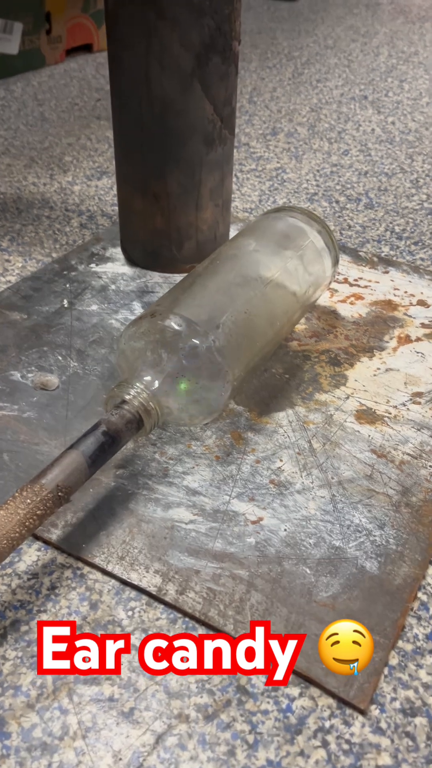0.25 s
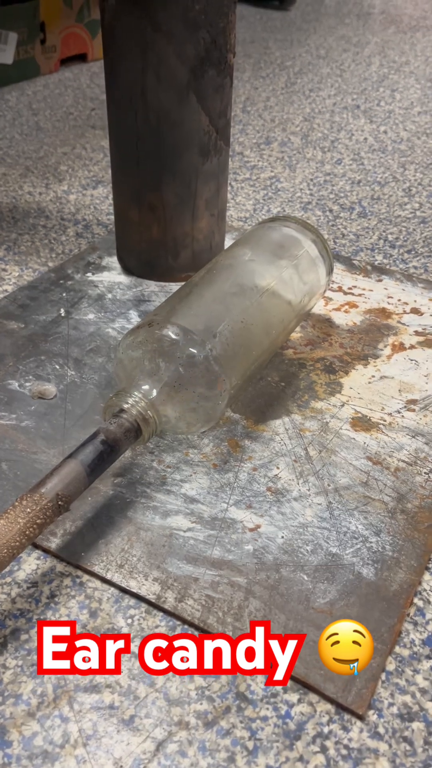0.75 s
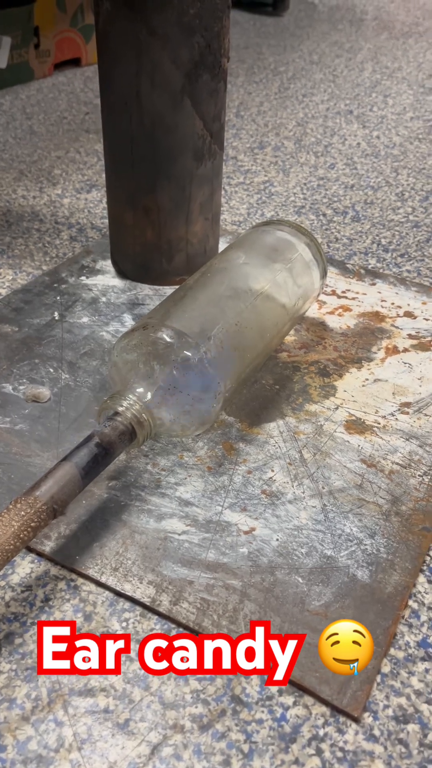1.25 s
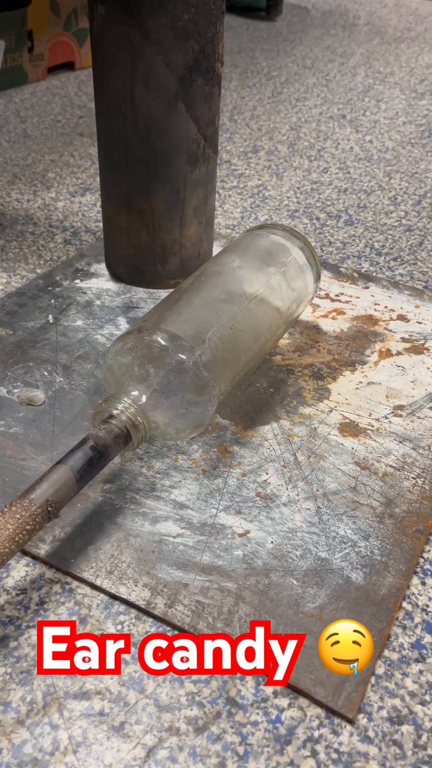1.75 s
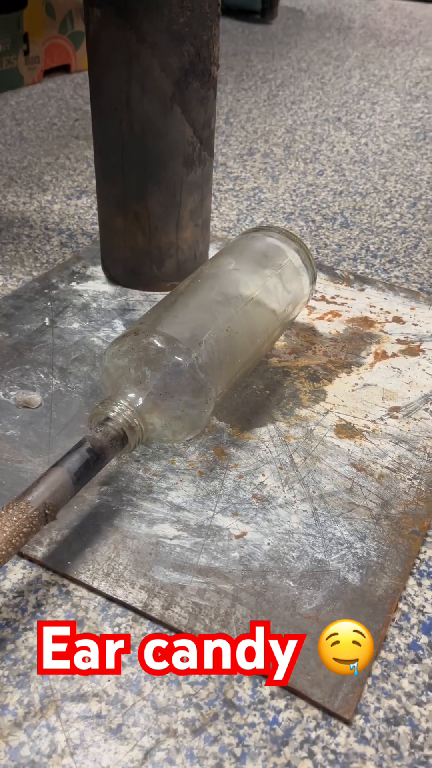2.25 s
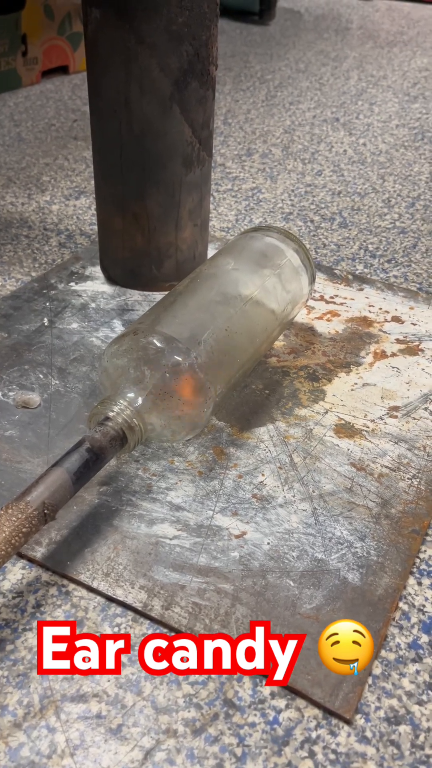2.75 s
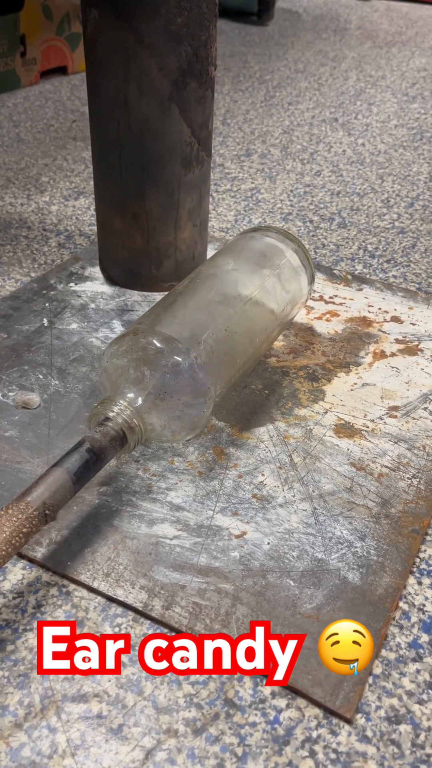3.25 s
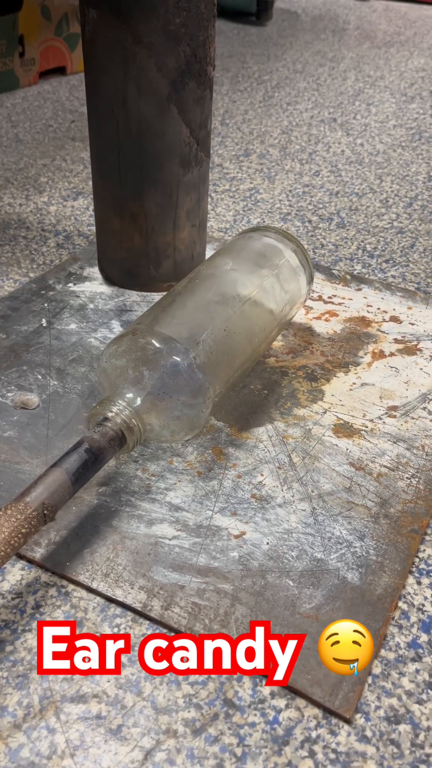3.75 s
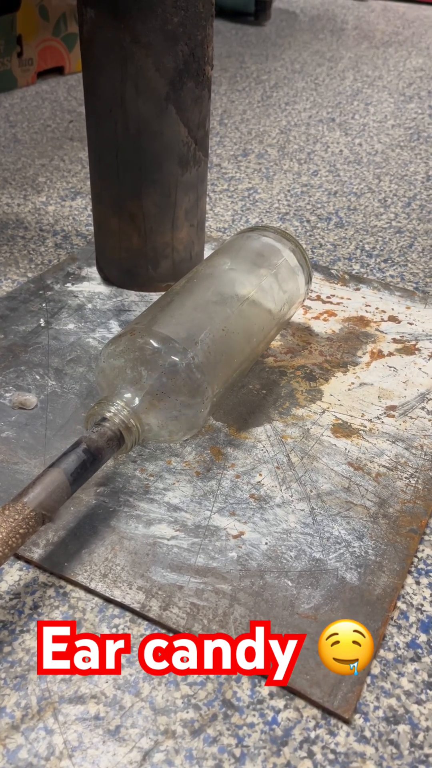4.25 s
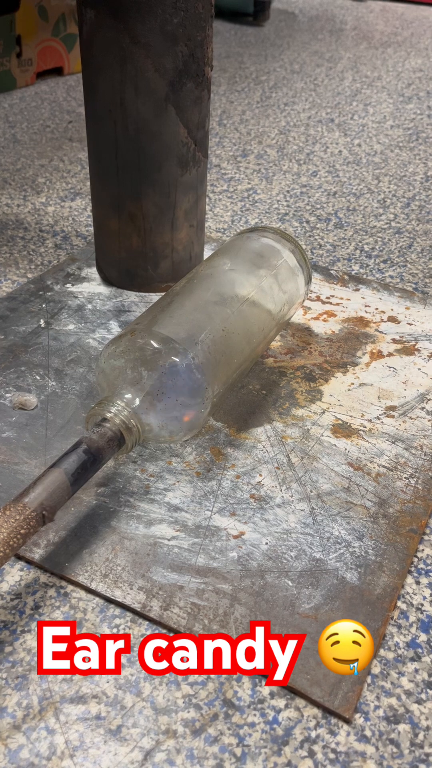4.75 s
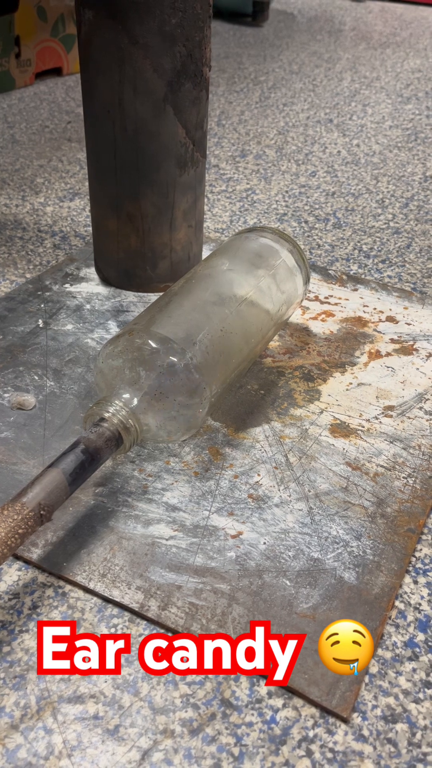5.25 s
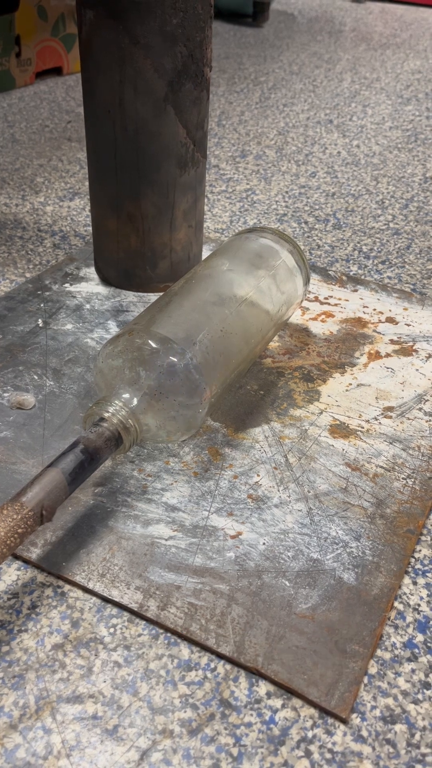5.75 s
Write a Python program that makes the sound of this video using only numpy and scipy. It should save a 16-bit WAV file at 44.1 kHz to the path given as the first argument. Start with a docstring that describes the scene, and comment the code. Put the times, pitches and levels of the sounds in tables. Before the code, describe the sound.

A small homemade pulse jet sputters loudly close by outdoors, a rapid uneven rattle of raspy cracks and low booms.

```python
"""A fast, uneven sputter, close by and outdoors: a pulse jet made of a glass bottle and a steel pipe.
It fires some 30 times a second on a metal sheet. Each explosion spits a crack and a rasping jet of
shaped noise, booms through the pipe as a short swinging tone and gulps air back in one deep swing.
Behind them the pipe drones, the bottle whistles, the flame roars low and the yard adds a short tail."""
import sys
import numpy as np
from scipy import signal
from scipy.fft import rfft, irfft, next_fast_len
from scipy.io import wavfile
from scipy.ndimage import uniform_filter1d, map_coordinates

SR = 44100
rng = np.random.default_rng(int(sys.argv[2]) if len(sys.argv) > 2 else 0)


def file_out(sig):
    """Save sig as 16-bit WAV at sys.argv[1]."""
    # one column per channel
    cols = np.atleast_2d(sig).T
    # limit, then scale
    lim = np.clip(cols, -1, 1)
    pcm = np.round(lim * 32767).astype(np.int16)
    wavfile.write(sys.argv[1], SR, pcm)


N = 264159  # length of the sound in samples

FIRING_HZ = 29  # the engine's own pace
RASP_RISE_S, HISS_RISE_S = .0036, .0033  # time for the jet to build up
RASP_FALL_S, HISS_FALL_S = .0028, .0018  # time for the jet to die away


def amp(db):
    """Turn decibels into a gain."""
    return 10 ** (np.asarray(db) / 20)


def unit(x):
    """Scale to an average strength (rms) of 1."""
    return x / np.sqrt(np.mean(x ** 2) + 1e-20)


def along(points, hz):
    """Read a curve of (pitch_hz, value) points, joined on a logarithmic pitch axis."""
    point_hz, value = np.transpose(points)
    return np.interp(np.log(hz + 1), np.log(point_hz + 1), value)


def filtered(x, response):
    """Multiply the spectrum of x by a response, which may be complex."""
    size = next_fast_len(N + SR // 2)
    spectrum = rfft(x, size) * response(np.fft.rfftfreq(size, 1 / SR))
    return irfft(spectrum, size)[..., :N]


def noise(colour):
    """Make noise of rms 1 whose spectrum follows a table of levels."""
    return unit(filtered(rng.standard_normal(N), lambda hz: amp(along(colour, hz))))


def resonate(x, modes):
    """Ring a set of resonances with x; a narrow one rings longer."""
    def response(hz):
        return sum(amp(db) * 1j * hz * width / (centre * centre - hz * hz + 1j * hz * width)
                   for centre, width, db in modes)
    return filtered(x, response)


def place(times_s, shape):
    """Add up one short sound per time; shape maps the seconds around it to rows (events, samples)."""
    k = np.arange(-SR // 32, SR // 16)
    at = np.round(times_s * SR).astype(int) + k
    inside = (at >= 0) & (at < N)
    return np.bincount(at[inside], shape(k / SR)[inside], N)


def swell(t, rise_s, fall_s):
    """A rounded peak, height 1 at t = 0, with exponential flanks."""
    return 2 / (np.exp(np.minimum(-t / rise_s, 50)) + np.exp(np.minimum(t / fall_s, 50)))


def spurt(t, rise_s, fall_s):
    """A peak of height 1 at t = 0 that bursts out of silence and dies exponentially."""
    return np.where(t < 0, np.exp(-(t / rise_s) ** 2), swell(t, fall_s, fall_s))


def swing(t, hz, glide, settle_s):
    """Phase of one swing: sharp by the share glide before t = 0, then sagging as the gas cools."""
    bend = np.log(2 / (np.exp(t / settle_s) + np.exp(-t / settle_s)))
    return 2 * np.pi * hz * (t + glide * settle_s * bend)


def wobble(rate_hz):
    """A smooth random curve with rate_hz knots a second."""
    knots = rng.standard_normal(int(N * rate_hz / SR) + 4)
    return map_coordinates(knots, [np.arange(N) * rate_hz / SR])


def vary(firing_s, spread):
    """A random factor near 1 for each firing."""
    return np.exp(spread * rng.standard_normal(firing_s.shape))


def stored(firing_s, db, ebb_s):
    """Strength of a resonator that each firing tops up and that ebbs in between; rms 1."""
    supply = place(firing_s, lambda t: amp(db) ** 2 * spurt(t, RASP_RISE_S, RASP_FALL_S))
    energy = signal.lfilter([1], [1, -np.exp(-1 / (ebb_s * SR))], supply)
    return unit(np.sqrt(np.abs(energy) + 1e-12))


# The clearly heard explosions, from loud cracks to dull booms; levels only compare one with another.
# Columns: start_s, rasp_db, hiss_db, boom_db, boom_delay_s
EXPLOSION_LIST = [(0.035, -46, -59, -23.5, 0.004), (0.058, -35, -49.5, -15, 0.013),
                  (0.105, -41, -55, -20.5, 0.004), (0.133, -31.5, -41.5, -15.5, 0.011),
                  (0.168, -39, -48.5, -16.5, 0.009), (0.201, -31, -35.5, -9, 0.01),
                  (0.226, -36, -62, -9.5, 0.002), (0.25, -41.5, -51.5, -17.5, 0.0),
                  (0.297, -45.5, -71.5, -17.5, 0.002), (0.327, -37.5, -46.5, -12.5, 0.004),
                  (0.353, -37, -60.5, -18.5, 0.013), (0.381, -38.5, -63, -16.5, -0.00099),
                  (0.415, -25.5, -34, -11, 0.01), (0.437, -40.5, -57, -14, 0.015),
                  (0.471, -28.5, -38, -17, 0.01), (0.494, -30.5, -48, -18.5, 0.011),
                  (0.514, -34, -41, -13.5, 0.004), (0.535, -28.5, -40, -12, 0.005),
                  (0.559, -33.5, -39.5, -8, 0.011), (0.711, -41, -63, -19.5, -0.0),
                  (0.741, -33, -46, -16, 0.0049), (0.769, -42.5, -63, -16.5, 0.004),
                  (0.872, -44, -62, -27.5, 0.0022), (0.909, -38.5, -43, -14, 0.005),
                  (0.944, -42.5, -51, -14, 0.009), (0.969, -33, -45, -16.5, 0.009),
                  (0.995, -46, -57, -12.5, 0.01), (1.024, -38.5, -52, -16.5, 0.01),
                  (1.067, -43.5, -67, -20, 0.008), (1.093, -31.5, -49.5, -12.5, 0.009),
                  (1.151, -43.5, -55.5, -14, 0.004), (1.186, -28, -37, -12.5, 0),
                  (1.211, -40, -47, -18.5, 0.004), (1.238, -30.5, -40, -12.5, 0.01),
                  (1.262, -43.5, -57.5, -11.5, 0.009), (1.285, -22, -33.5, -7, 0.01),
                  (1.327, -30, -45.5, -14.5, 0.004), (1.381, -28.5, -37, -11.5, 0.0074),
                  (1.403, -40.5, -39.5, -11.5, 0.008), (1.429, -33.5, -50.5, -11.5, 0.003),
                  (1.454, -48, -76, -14.5, 0.01), (1.534, -40.5, -54, -23, 0.004),
                  (1.577, -35, -52, -20, 0.013), (1.601, -35, -49, -14, 0.0037),
                  (1.635, -41, -62, -19, 0.005), (1.666, -33.5, -42, -11.5, 0.011),
                  (1.698, -36, -56, -17.5, 0.003), (1.731, -36.5, -52, -13, 0.005),
                  (1.756, -49, -60, -19.5, 0.004), (1.829, -36.5, -48, -24.5, 0.028),
                  (1.874, -39, -50, -20, 0.01), (1.911, -35, -44.5, -16.5, 0.007),
                  (1.946, -44, -60.5, -15, 0.007), (1.981, -33.5, -48, -19, 0.0048),
                  (2.017, -33, -42, -16, 0.009), (2.045, -44, -58.5, -20, 0.002),
                  (2.07, -35, -43, -17.5, 0.01), (2.166, -40.5, -65.5, -13.5, 0.006),
                  (2.252, -41.5, -59.5, -19, 0.0039), (2.298, -39, -59, -20, 0.01),
                  (2.332, -44.5, -58, -25, 0.007), (2.37, -34.5, -46.5, -22.5, 0.006),
                  (2.406, -43.5, -53, -14, 0.013), (2.482, -34.5, -53.5, -14, 0.003),
                  (2.515, -44.5, -73, -18, 0.006), (2.58, -39, -56.5, -17.5, 0.007),
                  (2.615, -45.5, -63.5, -16, 0.01), (2.666, -46, -60.5, -18, 0.000067),
                  (2.7, -32.5, -51.5, -19.5, 0.004), (2.738, -45, -64.5, -21, 0.001),
                  (2.772, -69.5, -85, -15.5, 0.007), (2.852, -36.5, -49.5, -16.5, 0.012),
                  (2.893, -45, -69.5, -18, 0.011), (2.92, -56, -79, -18.5, 0.006),
                  (2.962, -34, -45.5, -22, 0.00005), (2.991, -53.5, -57, -26, 0.0014),
                  (3.018, -32.5, -45.5, -13.5, 0), (3.048, -50, -74, -16, 0.006),
                  (3.09, -42.5, -53.5, -13.5, 0.002), (3.115, -38, -56.5, -17, 0.006),
                  (3.153, -55.5, -85, -15.5, 0.006), (3.194, -32.5, -40, -20, 0.004),
                  (3.221, -38, -42, -12.5, 0.011), (3.279, -38.5, -52, -14, 0.005),
                  (3.313, -44, -58, -19, 0.007), (3.342, -31, -43, -14, 0.006),
                  (3.371, -59, -72, -16, 0.006), (3.409, -39, -49.5, -20, 0.0012),
                  (3.433, -33.5, -45.5, -13, 0.007), (3.463, -35, -43.5, -12.5, 0.013),
                  (3.493, -50, -59.5, -15.5, 0.008), (3.524, -38, -59, -15.5, 0.007),
                  (3.576, -41, -51, -15.5, 0.01), (3.654, -41.5, -57.5, -22, 0.002),
                  (3.685, -44.5, -54, -13.5, 0.01), (3.758, -38, -52, -21, 0.011),
                  (3.797, -33.5, -44, -17.5, 0.008), (3.865, -30.5, -47, -15.5, 0.005),
                  (3.899, -53, -67, -19, 0.0033), (3.932, -47.5, -73, -22, 0.007),
                  (3.933, -43, -72, -26, 0.007), (4.123, -37, -53.5, -15.5, 0.011),
                  (4.153, -34, -50.5, -17, 0), (4.194, -46.5, -76.5, -15.5, 0.005),
                  (4.223, -38.5, -54.5, -17, 0.005), (4.264, -31.5, -41.5, -11.5, 0.001),
                  (4.348, -34, -54, -23.5, 0.011), (4.422, -43, -53.5, -16.5, 0.006),
                  (4.498, -31.5, -44, -18, 0.008), (4.524, -62.5, -81.5, -14.5, 0.006),
                  (4.551, -37.5, -58, -20.5, -0.00036), (4.615, -38, -61, -16, 0.007),
                  (4.642, -34.5, -50.5, -12, 0.008), (4.675, -37, -53, -16, 0.011),
                  (4.704, -35.5, -39.5, -13.5, 0.012), (4.733, -33, -43, -10.5, 0.008),
                  (4.756, -44, -54, -14, 0.008), (4.786, -32.5, -42, -12, 0.009),
                  (4.847, -36.5, -45.5, -17.5, 0.005), (4.871, -36, -45.5, -18, 0.014),
                  (4.901, -33.5, -44.5, -14.5, 0.007), (4.925, -40.5, -46.5, -10.5, 0.011),
                  (4.95, -32, -50.5, -14, 0.01), (4.978, -37.5, -49.5, -13, 0.005),
                  (5.009, -35, -44.5, -18.5, 0.0067), (5.036, -40, -46.5, -15.5, 0.00008),
                  (5.089, -39, -50, -9, 0.009), (5.124, -39.5, -60, -12.5, 0.005),
                  (5.151, -30, -42, -14, 0.001), (5.179, -38, -44.5, -12.5, 0.007),
                  (5.209, -40.5, -45.5, -16, 0.007), (5.239, -38.5, -54, -18, 0.005),
                  (5.267, -55.5, -77, -15, 0.006), (5.295, -44.5, -66, -14, 0.015),
                  (5.334, -33, -47.5, -17.5, 0.013), (5.362, -39, -52.5, -16.5, 0.003),
                  (5.388, -42.5, -51.5, -14, 0.001), (5.42, -45, -63.5, -28.5, 0.003),
                  (5.484, -35, -46, -17.5, 0.012), (5.517, -41.5, -51.5, -15, 0.008),
                  (5.553, -35, -53, -12.5, 0.006), (5.581, -33.5, -50.5, -14, 0.007),
                  (5.612, -29.5, -39.5, -13.5, 0.006), (5.645, -38, -58, -20.5, 0.006),
                  (5.705, -44, -67, -16, 0.006), (5.774, -32.5, -47, -15, 0.002),
                  (5.894, -49.5, -73, -18, 0.0029), (5.934, -34.5, -50.5, -15, 0.01)]
# A weak puff, before its strength is varied; the huge delay puts its own boom out of hearing.
# Columns: rasp_db, hiss_db, boom_db, boom_delay_s
WEAK_PUFF = (-50, -73.5, -17, 3)
FADE_DB_PER_S = 50.5  # the puffs weaken as a pause goes on


def firings(jitter_s=.004, scatter_db=3, count=5):
    """List the clear explosions, plus up to count random weak puffs that keep the pace in each pause."""
    # the engine is already running, and runs on
    edges_s = np.r_[-1 / FIRING_HZ, np.transpose(EXPLOSION_LIST)[0], N / SR + 1 / FIRING_HZ]
    pause_s = np.diff(edges_s)[:, None]
    cycles = np.round(pause_s * FIRING_HZ)
    k = np.arange(1, count + 1)
    chance = rng.standard_normal((len(pause_s), count, 2))
    since_s = pause_s * k / np.maximum(cycles, 1) + jitter_s * chance[..., 0]
    strength_db = scatter_db * chance[..., 1] - FADE_DB_PER_S * since_s
    *levels_db, delay_s = WEAK_PUFF
    puff_levels = [db + strength_db for db in levels_db]
    puffs = np.dstack([edges_s[:-1, None] + since_s, *puff_levels, np.full_like(since_s, delay_s)])
    return np.vstack([EXPLOSION_LIST, puffs[k < cycles]]).T[..., None]


# How long the yard rings: the time for its tail to sink by 60 dB.
# Columns: pitch_hz, decay_s
YARD_DECAY = [(100, 0.19), (400, 0.37), (1500, 0.33), (5000, 0.26), (14000, 0.2)]
# Colour of the sound that the yard sends back.
# Columns: pitch_hz, level_db
YARD_COLOUR = [(100, -6.5), (400, -7), (1500, 4.5), (5000, 0), (9000, 1), (13500, -0.5), (15000, -19)]


def yard(sent, apart=0.49):
    """Nearby walls answer with a short tail of fading noise, much the same at both microphone ports."""
    coloured = filtered(sent, lambda hz: amp(along(YARD_COLOUR, hz)))
    hz, t, cells = signal.stft(rng.standard_normal((2, SR * 3 // 4)), SR, nperseg=256)
    fading = cells * amp(-60 * t / along(YARD_DECAY, hz)[:, None])
    mid, side = signal.istft(fading, SR, nperseg=256)[1]
    tail = np.array([mid + apart * side, mid - apart * side]) / np.linalg.norm(mid)
    return signal.fftconvolve(coloured[None], tail, axes=1)[:, :N]


# Colour of the flame's roar.
# Columns: pitch_hz, level_db (relative, per Hz)
FLAME_COLOUR = [(15, -46.5), (28, -17), (45, -8), (70, 4.5), (190, -1.5), (300, 3.5), (370, -17),
                (520, -19.5), (900, -35), (1450, -55), (2000, -46.5), (5000, -55.5), (8000, -67.5),
                (15000, -91.5)]


def flame(firing_s, boom_db, steady_db=-42, flare_db=-13.0, rise_s=0.0026, linger_s=0.017):
    """The flame flares with each firing and sinks towards a steady low roar before the next."""
    flare = place(firing_s, lambda t: amp(boom_db + flare_db) * spurt(t, rise_s, linger_s))
    return (amp(steady_db) + flare) * noise(FLAME_COLOUR)


def drone(firing_s, boom_db, drone_hz=177, drone_db=-26, ebb_s=0.06, waver_rad=0.8, flutter_db=3.5):
    """The firings keep the pipe droning on one note, which flutters and wavers irregularly."""
    phase = 2 * np.pi * drone_hz * np.arange(N) / SR
    flutter = amp(flutter_db * wobble(FIRING_HZ))
    tone = flutter * np.sin(phase + waver_rad * wobble(FIRING_HZ))
    return amp(drone_db) * stored(firing_s, boom_db, ebb_s) * unit(tone)


# The bottle's length mode, which whistles.
# Columns: pitch_hz, width_hz, level_db
WHISTLE_MODE = [(1454.5, 98, 0)]
# Moments when the whistle catches and swells, or dips where the change is negative.
# Columns: middle_s, change_db
WHISTLE_CATCHES = [(.39, -6), (.55, 14), (1.335, 11), (2.3, 12.5), (2.68, -6), (3.25, 9.5), (4.27, -7),
                   (4.43, 9), (4.88, 12.5), (5.03, 13)]
CATCH_S = .04  # half the length of such a change
OUTFLOW_S = .018  # time for the flow through the neck to ebb after a firing


def whistle(firing_s, jet_db, whistle_db=-55, ebb_s=.032, grows=0.81, cool_s=.15, bend_hz=32):
    """Gas rushing through the neck whistles: louder after strong jets, flatter as the gas cools."""
    rush = place(firing_s, lambda t: np.ones_like(firing_s) * spurt(t, RASP_RISE_S, OUTFLOW_S))
    # the mode acts twice, so the whistle has steep flanks
    once = resonate(rush * rng.standard_normal(N), WHISTLE_MODE)
    tone = resonate(once, WHISTLE_MODE)
    shift_hz = bend_hz * np.log(stored(firing_s, jet_db, cool_s) + .1)
    turn = np.exp(2j * np.pi * np.cumsum(shift_hz) / SR)
    bent = np.real(signal.hilbert(tone, next_fast_len(N))[:N] * turn)
    t = np.arange(N) / SR
    catch_db = sum(db * np.exp(-((t - at) / CATCH_S) ** 2) for at, db in WHISTLE_CATCHES)
    return amp(whistle_db + catch_db) * stored(firing_s, jet_db, ebb_s) ** grows * unit(bent)


USUAL_HISS_DB = -50  # hiss of an average explosion


def gulp(firing_s, hiss_db, usual_db=-15.5, grows=0.36, uneven=.12, delay_s=0.01727, pitch_hz=74,
         rise_s=0.0076, fall_s=0.0084, glide=0.32, settle_s=0.0021, spread=0.16):
    """Burnt gas overshoots and air is sucked back: one slow, deep swing, larger after a faster jet."""
    size = amp(usual_db + grows * (hiss_db - USUAL_HISS_DB)) * vary(firing_s, uneven)
    hz = pitch_hz * vary(firing_s, spread)

    def pull(t):
        return size * swell(t, rise_s, fall_s) * np.cos(swing(t, hz, glide, settle_s))
    return place(firing_s + delay_s, pull)


# Air modes of the hot pipe.
# Columns: pitch_hz, width_hz, level_db
PIPE_MODES = [(198, 5.9, -7), (303.7, 36, 4.5), (298, 41, -20)]


def boom(firing_s, boom_db, delay_s, boom_gain_db=4.5, ring_db=1, prompt_hz=208, sag_hz_per_s=2700,
         spread=0.086, rise_s=0.0027, fall_s=0.0051, glide=0.31, settle_s=0.0039, scatter_rad=0.78,
         edge_hz=345):
    """The gas column swings briefly, lower when it starts late, and stirs the pipe's other modes."""
    hz = (prompt_hz - sag_hz_per_s * delay_s) * vary(firing_s, spread)
    start_rad = scatter_rad * rng.standard_normal(firing_s.shape)

    def column(t):
        return -amp(boom_db) * swell(t, rise_s, fall_s) * np.sin(swing(t, hz, glide, settle_s) + start_rad)
    push = place(firing_s + delay_s, column)
    both = amp(boom_gain_db) * push + amp(ring_db) * resonate(push, PIPE_MODES)
    # the column is too heavy to follow faster changes
    return filtered(both, lambda f: 1 / (1 + (f / edge_hz) ** 12))


USUAL_JET_DB = -37  # rasp of an average explosion


def crack(firing_s, jet_db, crack_db=8, width_s=0.00055, spread=0.21, harden=0.09):
    """The pressure front leaves the mouth as one push and pull, hardest for the strongest charges."""
    size = amp(crack_db + jet_db + harden * (jet_db - USUAL_JET_DB))
    w = width_s * vary(firing_s, spread)
    return place(firing_s, lambda t: -size * (t / w) / (1 + (t / w) ** 2) ** 2)


# Colour of the jet's hiss.
# Columns: pitch_hz, level_db (relative, per Hz)
HISS_COLOUR = [(700, -3), (2000, -5), (2750, -2), (3300, 5), (4200, -11), (4700, 1.5), (5400, -4.5),
               (6300, -8.5), (9000, -10.5), (13500, -16), (16000, -23.5)]


def sizzle(speed, corner_hz=7500, steep=1.0, top_db=6.5):
    """Hiss that follows the jet's speed: a faster jet has more fine eddies and more top treble."""
    hiss = noise(HISS_COLOUR)
    top = filtered(hiss, lambda hz: hz ** 4 / (hz ** 4 + corner_hz ** 4))
    brightness = amp(top_db) * (speed / speed.max()) ** steep
    return speed * (hiss - top + brightness * top)


# Colour of the jet's dull rasp.
# Columns: pitch_hz, level_db (relative, per Hz)
RASP_COLOUR = [(200, -22), (370, -0.5), (480, 6.5), (700, -2.5), (900, -11.5), (1300, -9), (1800, -22.5),
               (2500, -29.5), (5000, -68.5)]
# Air modes of the hot bottle.
# Columns: pitch_hz, width_hz, level_db
BOTTLE_MODES = [(490, 22, -0.5), (744, 33, -21.5), (1450, 220, -1), (2340, 250, -17), (2944, 110, -4),
                (5100, 78, -32)]


def jet(firing_s, jet_db, jet_hiss_db, rasp_db=6.5, hiss_db=10.5, bottle_db=11, crackle_db=3.0,
        burn_spread=.16):
    """Each firing drives a short turbulent jet out of the mouth and rings the air in the bottle."""
    # a slow charge spreads the same energy over a longer burst
    length = vary(firing_s, burn_spread)

    def burst(db, rise_s, fall_s):
        return place(firing_s, lambda t: amp(db) * spurt(t / length, rise_s, fall_s) / np.sqrt(length))
    rasp = burst(jet_db, RASP_RISE_S, RASP_FALL_S)
    hiss = burst(jet_hiss_db, HISS_RISE_S, HISS_FALL_S)
    # eddies tear the jet into crackles a fraction of a millisecond long
    crackle = unit(uniform_filter1d(rng.standard_normal(N), size=24))
    eddies = unit(amp(crackle_db * crackle))
    ring = amp(bottle_db) * resonate(rasp * rng.standard_normal(N), BOTTLE_MODES)
    return amp(rasp_db) * rasp * noise(RASP_COLOUR) + amp(hiss_db) * eddies * sizzle(hiss) + ring


# Share of the sound's energy that reaches the two microphone ports out of step.
# Columns: pitch_hz, share (0 to 1)
SCATTERED_SHARE = [(300, 0), (600, .04), (900, .08), (1500, .05), (2100, .15), (2600, .4), (3600, .45),
                   (4400, .25), (5500, .08), (15000, .07)]


def bounce(x):
    """The jet is wide and shifting: reflections off the sheet reach each port with ever new phases."""
    cells = signal.stft(x, nperseg=64)[2]
    turned = cells * np.exp(2j * np.pi * rng.random((2, *cells.shape)))
    paths = x.std() * unit(signal.istft(turned, nperseg=64)[1][:, :N])
    direct = filtered(x, lambda hz: np.sqrt(1 - along(SCATTERED_SHARE, hz)))
    return direct + filtered(paths, lambda hz: np.sqrt(along(SCATTERED_SHARE, hz)))


def scene(jet_wet_db=-11.5, boom_wet_db=-13):
    """Add up the engine and the yard; the wet levels set how much of each part the yard hears."""
    firing_s, jet_db, hiss_db, boom_db, delay_s = firings()
    spit = jet(firing_s, jet_db, hiss_db) + crack(firing_s, jet_db)
    thud = boom(firing_s, boom_db, delay_s) + gulp(firing_s, hiss_db)
    ringing = drone(firing_s, boom_db) + whistle(firing_s, jet_db)
    sent = amp(jet_wet_db) * spit + amp(boom_wet_db) * thud
    return bounce(spit) + thud + ringing + flame(firing_s, boom_db) + yard(sent)


# How much earlier the left microphone port hears the sound.
# Columns: pitch_hz, left_lead_ms
PORT_LEAD = [(100, -.24), (200, -.28), (300, -.38), (500, -.33), (780, -.25), (1000, -.06), (1600, -.07),
             (2000, .06), (2700, .1), (3600, .2), (5000, .232), (6000, .247), (14500, .241)]
# How much louder the left port is than the right.
# Columns: pitch_hz, left_minus_right_db
PORT_BALANCE = [(40, -.2), (90, -.4), (180, -.8), (300, -1.8), (700, -3.7), (900, -7), (1400, -3.2),
                (2200, -1), (2850, -.5), (3300, -6), (4600, -7), (5400, 0)]
TOP_HZ = 15900  # nothing passes above this


def record(dry, low_cut_hz=39):
    """Two ports hear slightly different times and levels; peaks are rounded and both band ends cut."""
    sides = np.array([[1], [-1]]) / 2  # left and right each take half the difference

    def ports(hz):
        delay_turn = np.exp(2j * np.pi * hz * sides * along(PORT_LEAD, hz) / 1000)
        return amp(sides * along(PORT_BALANCE, hz)) * delay_turn

    def low_cut(hz):
        return 1 / np.sqrt(1 + (low_cut_hz / (hz + 1)) ** 10)
    x = filtered(dry, lambda hz: ports(hz) * low_cut(hz))
    rounded = x / (1 + (x / .97) ** 6) ** (1 / 6)
    return filtered(rounded, lambda hz: hz < TOP_HZ)


dry = scene()
out = record(dry)
file_out(out)
```